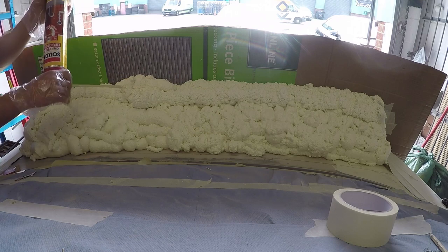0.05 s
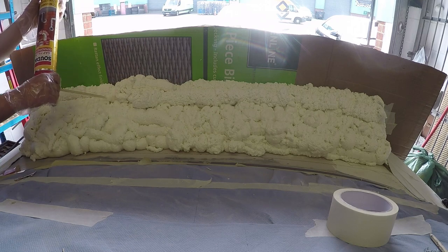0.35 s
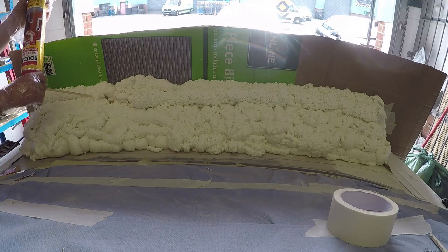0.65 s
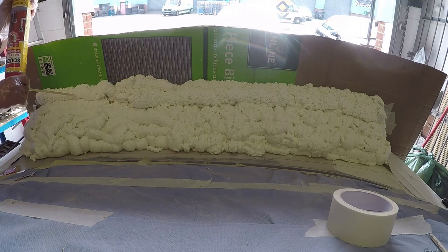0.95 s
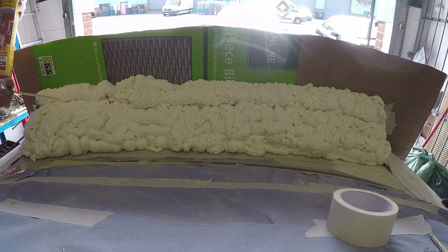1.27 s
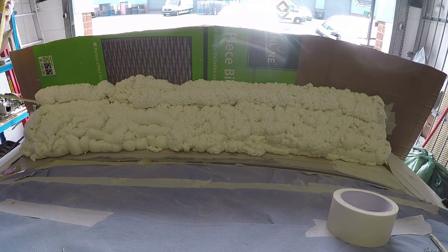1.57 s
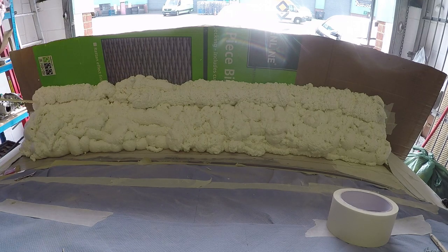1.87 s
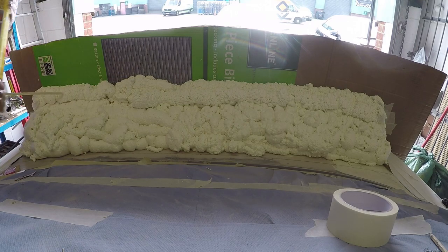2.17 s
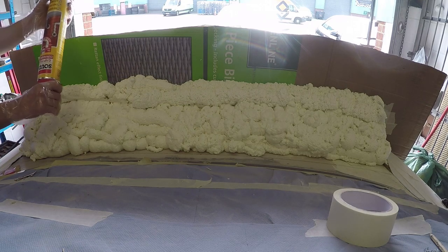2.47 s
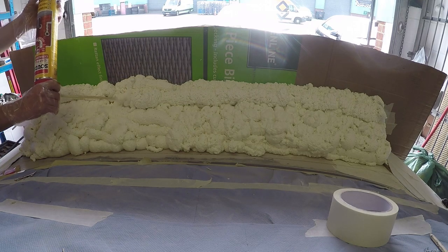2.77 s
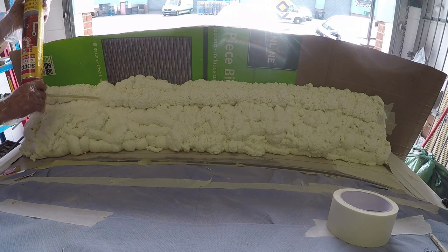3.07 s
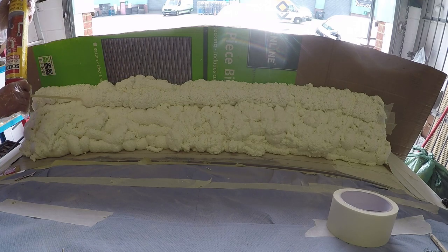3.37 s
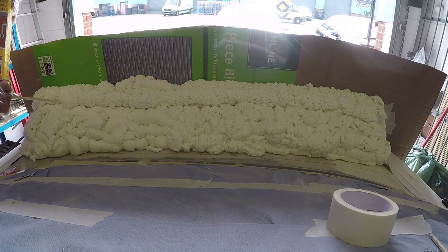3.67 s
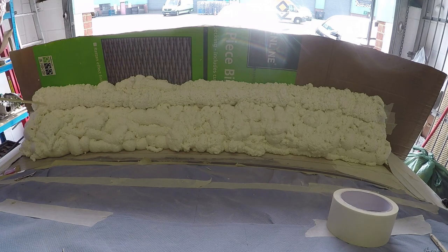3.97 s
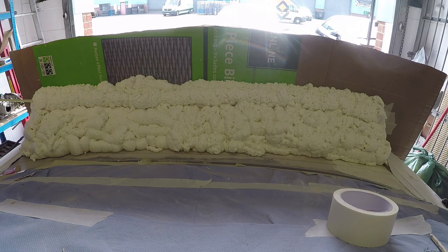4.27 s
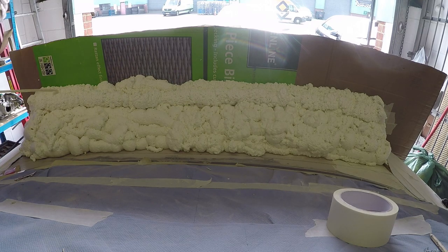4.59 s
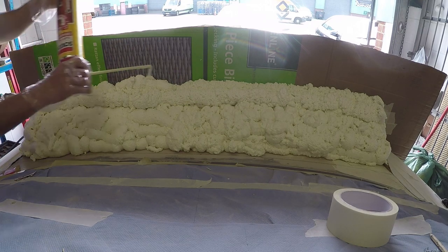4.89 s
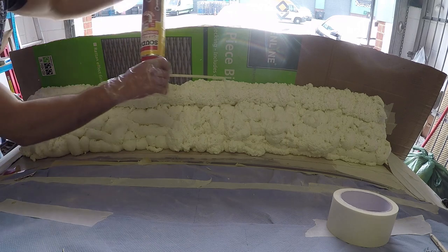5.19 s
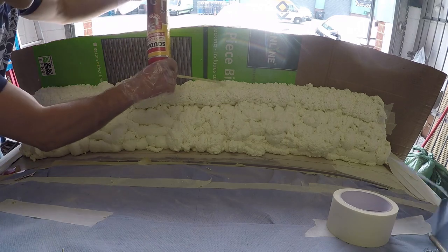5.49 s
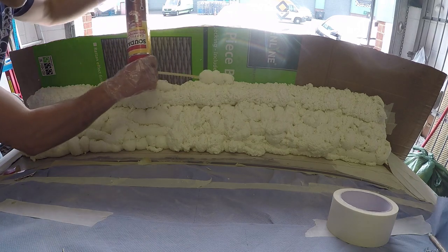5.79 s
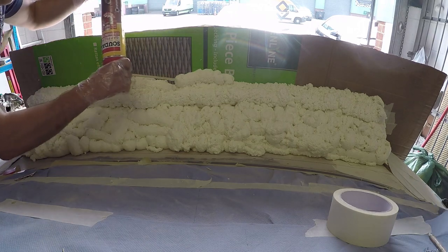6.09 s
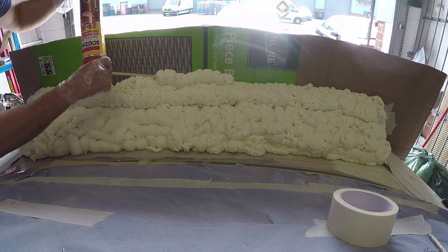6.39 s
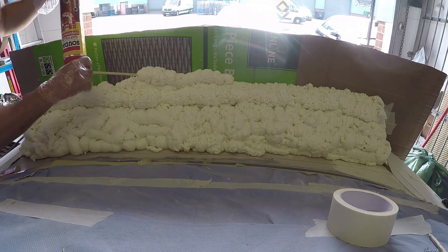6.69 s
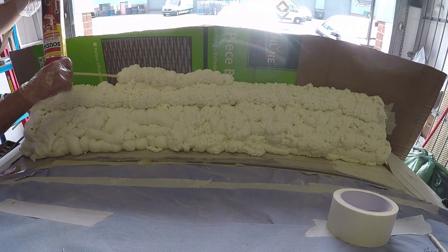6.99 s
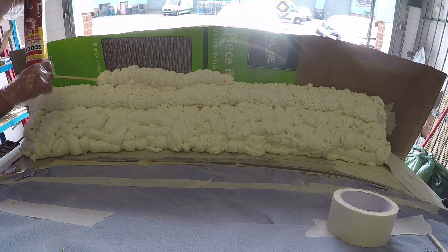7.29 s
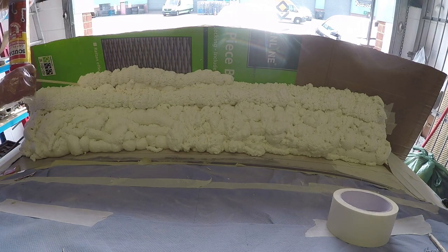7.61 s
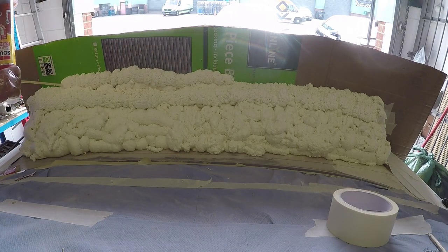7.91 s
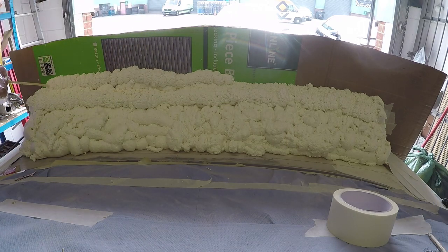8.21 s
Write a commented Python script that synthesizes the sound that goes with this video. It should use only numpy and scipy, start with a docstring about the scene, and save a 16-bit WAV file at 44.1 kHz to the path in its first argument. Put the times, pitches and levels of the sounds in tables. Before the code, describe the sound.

Foam spits and crackles from a spray can in three hissing bursts, the last one longest, over a faint low workshop rumble.

```python
"""Expanding foam in a workshop

A can of foam is sprayed through a straw in three long bursts. Each time the valve opens, gas hisses
first; then the foam spits and sputters as countless bubbles burst, coloured by the resonances of
hollows in the foam bead. In the pauses the reverberation dies away over a low rumble and faint ticks."""
import sys
import numpy as np
from scipy import signal
from scipy.fft import rfft, irfft
from scipy.io import wavfile
from scipy.ndimage import uniform_filter1d

SR = 44100
rng = np.random.default_rng(int(sys.argv[2]) if len(sys.argv) > 2 else 0)


def pcm_store(signal):
    """Save signal as 16-bit PCM."""
    levels = np.round(np.clip(np.atleast_2d(signal), -1, 1) * 32767)
    wavfile.write(sys.argv[1], SR, levels.astype(np.int16).T)


N = 363825
TIME = np.arange(N) / SR
FRAME, HOP = 512, 128
HZ = np.fft.rfftfreq(FRAME, 1 / SR)[:, None]
CLOSE_S = 0.087  # time the valve takes to shut

# Squeezes of the trigger. Each row: arrival of the foam, lead of the gas and duration of the foam in
# seconds, first crack in dB, nominal pressure sag in dB per second, valve opening time in seconds,
# and relative levels of gurgle, coarse bubbles and fine bubbles in dB.
SQUEEZES = [(0.364, 0.085, 1.44, 6, 2.5, 0.005, -32.5, -32.5, -20.5),
            (2.676, 0.14, 1.55, 15.5, 1.5, 0.039, -33.5, -32, -22),
            (5.563, 0.13, 2.68, 13.5, 0.47, 0.075, -31.5, -31, -25)]
# Spectra of the coarse and the fine bubbles. Each row: frequency in Hz, relative level in dB.
COARSE_SPECTRUM = [(600, -23.5), (1050, -8), (1300, -3), (2200, -2.5), (2700, -6), (4500, -33)]
FINE_SPECTRUM = [(1400, -25), (2200, -7), (2800, -3), (3500, -1.5), (4500, -4), (5500, -10), (6700, -15),
                 (8200, -25), (12000, -49.5)]


def amp(db):
    """Amplitude grows tenfold for every 20 dB."""
    return 10 ** (np.asarray(db) / 20)


def unit(x):
    """Normalisation to an rms of 1."""
    return x / np.sqrt(np.mean(x ** 2) + 1e-20)


def at_frequency(points, hz):
    """Linear interpolation on a logarithmic frequency axis."""
    frequencies, values = np.transpose(points)
    return np.interp(np.log(hz + 1), np.log(frequencies + 1), values)


def bell(x, centre, width):
    """A Gaussian of height 1 with the given full width at half height."""
    return np.exp(-np.log(2) * (2 * (x - centre) / width) ** 2)


def coloured_noise(spectrum):
    """Spectral weighting turns white noise into coloured noise of rms 1."""
    gain = amp(at_frequency(spectrum, np.fft.rfftfreq(N, 1 / SR)))
    return unit(irfft(rfft(rng.standard_normal(N)) * gain, N))


def wander(rate_hz):
    """Low-passed noise of rms 1 fluctuates at up to about the given rate."""
    lowpass = bell(np.fft.rfftfreq(N, 1 / SR), 0, 2 * rate_hz)
    return unit(irfft(rfft(rng.standard_normal(N)) * lowpass, N))


def patches(shape, across_hz, lasting_s):
    """Smoothing correlates a random field of rms 1 over frequency and time."""
    field = rng.standard_normal(shape)
    for axis, span in enumerate([across_hz * FRAME / SR, lasting_s * SR / HOP]):
        lowpass = np.expand_dims(bell(np.fft.rfftfreq(shape[axis]), 0, 1 / span), 1 - axis)
        field = irfft(rfft(field, axis=axis) * lowpass, shape[axis], axis=axis)
    return unit(field)


def earlier_burst(db, pause_s):
    """Reverberation outlasts its source: froth in the second before the scene excites the room."""
    froth = unit(coloured_noise(FINE_SPECTRUM) + 0.64 * coloured_noise(COARSE_SPECTRUM))
    return (amp(db) * froth * (TIME < 1 - pause_s))[:SR]


def reverberation(source, gap_s):
    """Dense reflections form a diffuse field that decays exponentially, each band at its own rate."""
    # Decay of the workshop. Each row: frequency in Hz, time to fall by 60 dB in seconds.
    decay_times = [(200, 1.2), (530, 0.32), (1400, 1.01), (3300, 1.03), (6000, 0.7), (10000, 0.61),
                   (15000, .35)]
    # Strength of the diffuse field. Each row: frequency in Hz, relative level in dB.
    strengths = [(200, -4.5), (650, -3), (1400, -3.5), (3300, -9), (6000, -8.5), (14000, -9.5)]
    _, t, noise = signal.stft(rng.standard_normal(SR * 2), SR, nperseg=FRAME)
    decay = amp(-60 * t / at_frequency(decay_times, HZ)) * (t >= gap_s)
    decay /= np.sqrt(np.mean(decay ** 2, axis=1, keepdims=True) * SR * 2)
    tail = signal.istft(noise * decay * amp(at_frequency(strengths, HZ)), SR, nperseg=FRAME)[1]
    return signal.fftconvolve(source, tail)


def background(rumble_db, hum_hz, hum_db):
    """Broadband rumble lies under a machine hum, randomly modulated in frequency and amplitude."""
    # Ambient noise of the workshop. Each row: frequency in Hz, relative level in dB.
    rumble_spectrum = [(20, -12), (33, -7), (55, -11), (90, -17), (170, -21), (300, -30), (750, -33.5),
                       (1200, -34.5), (3000, -40), (7000, -50), (15000, -58.5)]
    pitch_hz = hum_hz + 1.11 * wander(rate_hz=5.2)
    hum = np.sqrt(2) * np.sin(2 * np.pi * np.cumsum(pitch_hz) / SR)
    rumble = amp(rumble_db) * coloured_noise(rumble_spectrum)
    return rumble + amp(hum_db + 3.9 * wander(rate_hz=6.5)) * hum


def flow(held_db, leak_db, fill_db_per_s, gush_db, slump_db, sag_share, shut_db):
    """Amplitude follows the flow, which leaks, gushes, slumps, sags with the pressure and is shut off."""
    fade_in_s, fade_in_db = 0.073, -9.5  # a faint hiss fades in just before each burst
    arrive_s, settle_s = 0.018, 0.09  # the foam bursts out and its gush settles
    slump_after_s, slump_s = 0.17, 0.17  # the pressure in the straw is spent
    gain = np.zeros(N)
    for (arrival, leak_s, lasts_s, _, sag_db_per_s, opening_s, *_), db in zip(SQUEEZES, held_db):
        wait, age = np.maximum(arrival - TIME, 0), np.maximum(TIME - arrival, 0)
        onset = np.interp(leak_s - wait, [-fade_in_s, 0, opening_s], [0, amp(fade_in_db), 1])
        filling = leak_db - fill_db_per_s * wait
        gush = gush_db * np.exp(-age / settle_s)
        slump = slump_db * bell(age, slump_after_s, slump_s)
        foaming = gush + slump - sag_share * sag_db_per_s * age
        arrived = np.minimum(age / arrive_s, 1)
        shut = np.clip((age - lasts_s) / CLOSE_S, 0, 1)
        level_db = db + (1 - arrived) * filling + arrived * foaming + shut_db * shut
        gain += onset * (shut < 1) * amp(level_db)
    return uniform_filter1d(gain, size=150)


def envelopes():
    """One flow drives gurgle, coarse bubbles, fine bubbles and gas, each with its own envelope."""
    # Gas hiss, one curve a burst. Each point: time in seconds, relative level in dB.
    hiss_curves = [
        [(0.425, -43.5), (0.455, -57.5), (0.837, -41), (1.349, -49), (1.469, -55.5), (1.657, -46.5),
         (1.81, -55)],
        [(2.78, -45.5), (4.006, -44), (4.3, -45)],
        [(5.68, -43), (5.78, -52.5), (6.14, -44.5), (7.62, -46), (7.69, -52), (8.2, -51.5)],
    ]
    # Stretches of coarser foam. Each row: middle and length in seconds, lifts of the gurgle and of
    # the coarse bubbles in dB.
    coarse_runs = [(0.574, 0.17, 3.5, 4), (1.71, 0.21, -2.5, 4), (6.36, 0.54, -0.5, 4.5),
                   (8.2, 0.37, 1.5, 4)]
    *_, gurgle_db, coarse_db, fine_db = np.transpose(SQUEEZES)
    gas_db = [np.interp(TIME, *np.transpose(curve)) for curve in hiss_curves]
    wetter = sum(db * bell(TIME, s, length) for s, length, db, _ in coarse_runs)
    coarser = sum(db * bell(TIME, s, length) for s, length, _, db in coarse_runs)
    gurgle = flow(gurgle_db, leak_db=1, fill_db_per_s=142,
                  gush_db=-3.5, slump_db=-4, sag_share=0.95, shut_db=0.5)
    coarse = flow(coarse_db, leak_db=-3, fill_db_per_s=129,
                  gush_db=13.5, slump_db=1, sag_share=1.14, shut_db=4)
    fine = flow(fine_db, leak_db=-20, fill_db_per_s=75,
                gush_db=1, slump_db=-3.5, sag_share=1.06, shut_db=-11)
    gas = flow(gas_db, leak_db=0.5, fill_db_per_s=61.5,
               gush_db=4, slump_db=1.7, sag_share=0, shut_db=-10.5)
    return gurgle * amp(wetter), coarse * amp(coarser), fine, gas


def bubbles(per_s, spread_db, rush):
    """Bursting bubbles make shot noise: independent random clicks, here in a smooth rush of gas."""
    sizes = amp(spread_db * np.minimum(rng.standard_normal(N), 2)) * rng.choice([-1, 1], N)
    clicks = sizes * (rng.random(N) < per_s / SR)
    return unit(unit(clicks) + rush * rng.standard_normal(N))


def bead_resonances(t):
    """Cavities in the foam resonate and shift as it grows: a lift in dB by frequency and frame."""
    # The cavity dug by the jet. Each row: time in seconds, resonance in Hz, lift in dB, width in Hz.
    jet_cavity = [(.45, 3240, 0, 500), (.65, 3320, 5.5, 500), (.95, 3400, 8, 380), (1.35, 3600, 5.5, 400),
                  (1.6, 3400, 1.5, 400), (2.75, 3100, 7.5, 450), (2.9, 3480, 2.5, 1000),
                  (3.33, 4050, 4.5, 800), (3.58, 3850, 2.5, 600), (3.7, 3560, 7.5, 400),
                  (4.12, 3520, 8, 380), (4.33, 3170, 2, 500), (5.7, 3060, 2, 400), (8.2, 2920, 4.5, 350)]
    # Hollows around the straw tip, one list a burst. Each row: centre and width in Hz, lift in dB.
    tip_hollows = [
        [(636, 170, 3.5), (1370, 200, 4), (2200, 270, 1.5), (2800, 260, 5.5), (3980, 300, 0), (4530, 580, 0.5),
         (6160, 1100, -5)],
        [(873, 136, -10), (1125, 270, 4), (1720, 480, 1.5), (4440, 500, -1.5), (5300, 420, 2), (6800, 750, 0)],
        [(314, 67, -1), (680, 500, 6.5), (1270, 420, -2), (2180, 200, 2.5), (3430, 210, -0.5), (3930, 490, 3.5),
         (5160, 500, -4.5), (6300, 910, 1.5)],
    ]
    # Gas pockets that ring as they blow open or muffle as they fill. Each row: middle and length in
    # seconds, centre and width in Hz, lift in dB, glide in Hz per second.
    gas_pockets = [ (0.402, 0.045, 2430, 706, 8, 0), (0.737, 0.11, 5500, 800, 11, -2000),
                   (0.86, 0.17, 4650, 580, 12, -900), (1.55, 0.26, 4500, 805, 5, 0),
                   (1.717, 0.2, 2900, 700, -4, 0), (2.694, 0.026, 4750, 750, 17, 0),
                   (3.558, 0.084, 6430, 1200, 8, 0), (3.87, 0.34, 4050, 450, -7, 0),
                   (3.93, 0.15, 2900, 360, 13.5, 2800), (4.1, 0.17, 4900, 1100, 9, -1500),
                   (5.585, 0.024, 3350, 600, 17.5, -4), (5.587, 0.043, 5760, 2400, 14, -2),
                   (6.894, 0.4, 6300, 1600, 7, 0), (8.1, 0.94, 6700, 1200, -3, 0),
                   (8.15, 0.5, 355, 300, -4.5, 0), ]
    times, *columns = np.transpose(jet_cavity)
    cavity_hz, cavity_db, cavity_width = (np.interp(t, times, column) for column in columns)
    lift = cavity_db * bell(HZ, cavity_hz, cavity_width)
    for (arrival, leak_s, lasts_s, *_), hollows in zip(SQUEEZES, tip_hollows):
        spraying = (t >= arrival - leak_s) & (t <= arrival + lasts_s + CLOSE_S)
        lift += sum(db * bell(HZ, hz, width) for hz, width, db in hollows) * spraying
    for s, length, hz, width, db, glide in gas_pockets:
        lift += db * bell(HZ, hz + glide * (t - s), width) * bell(t, s, length)
    swelling = 1.28 * patches(lift.shape, across_hz=170, lasting_s=0.12)  # the bead grows slowly
    frothing = 2.03 * patches(lift.shape, across_hz=600, lasting_s=0.025)  # its skin opens and closes
    return lift + swelling + frothing


def resonate(drive, spectrum, lift):
    """A time-varying filter redistributes the power of a white source without changing its total."""
    frames = signal.stft(drive, nperseg=FRAME, noverlap=FRAME - HOP)[2]
    gain = amp(at_frequency(spectrum, HZ) + lift[:, :frames.shape[1]])
    gain /= np.sqrt(np.mean(gain ** 2, axis=0))
    return signal.istft(frames * gain, nperseg=FRAME, noverlap=FRAME - HOP)[1][:N]


def cracks(rise_s, decay_s):
    """Releasing the pressure stored in the straw makes a transient: a brief lift in dB."""
    return sum(db * np.interp(TIME - arrival, [0, rise_s, rise_s + decay_s], [0, 1, 0])
               for arrival, _, _, db, *_ in SQUEEZES)


def spray(lift):
    """Plugs of foam leaving the straw modulate the amplitude of bubble and gas noise into a sputter."""
    # Spectra of the gurgle and the escaping gas. Each row: frequency in Hz, relative level in dB.
    gurgle_spectrum = [(50, -46), (120, -37), (200, -2.5), (350, -0.5), (680, 2), (1000, 2.5), (1400, -11),
                       (2500, -43)]
    gas_spectrum = [(2000, -29), (3100, -0.5), (4500, 1), (8000, -7), (10000, -6.5), (13000, -8),
                    (15500, -15.5)]
    plugs, surges = wander(rate_hz=140), 0.65 * wander(rate_hz=7)
    crack = cracks(rise_s=0.011, decay_s=0.036)
    gurgle_drive = bubbles(per_s=2500, spread_db=4, rush=1.54)
    coarse_drive = bubbles(per_s=4000, spread_db=2, rush=0.93) * amp(0.35 * plugs)
    fine_drive = bubbles(per_s=7500, spread_db=3.5, rush=1) * amp(1.1 * plugs)
    gas_drive = bubbles(per_s=8300, spread_db=0, rush=2.6) * amp(1.6 * plugs)
    gurgle = resonate(gurgle_drive, gurgle_spectrum, lift) * amp(-1.5 + surges)
    coarse = resonate(coarse_drive, COARSE_SPECTRUM, lift) * amp(-2 + surges)
    fine = resonate(fine_drive, FINE_SPECTRUM, lift) * amp(-1.33 + surges + 0.36 * crack)
    gas = resonate(gas_drive, gas_spectrum, lift) * amp(5.5 + surges + crack)
    sputter = sum(part * gain for part, gain in zip([gurgle, coarse, fine, gas], envelopes()))
    return sputter + spits(lift, plugs, hole_db=8, hole_width_hz=1460)


def spits(lift, plugs, hole_db, hole_width_hz):
    """A slug of gas escaping between plugs of foam excites the resonance of the hole it blows."""
    # Slugs of gas. Each row: middle and length in seconds, level in dB, resonance of the hole in Hz.
    slugs = [(1.49, 0.037, -28, 4200), (1.54, 0.04, -25, 4500), (1.657, 0.023, -21.5, 4170),
             (2.745, 0.077, -23.5, 3100), (2.808, 0.028, -20.5, 3300), (3.018, .034, -31, 3480),
             (3.548, 0.035, -29, 3900), (3.688, 0.046, -22, 3600), (4.306, 0.074, -23, 3100),
             (5.635, 0.025, -21, 2200), (5.744, 0.073, -20.5, 2400), (5.863, 0.025, -23, 3650),
             (6.036, 0.03, -22, 2670), (6.241, 0.04, -21, 3330), (6.373, 0.03, -20, 2770),
             (6.597, 0.085, -23.5, 3200), (6.741, 0.047, -20.5, 2770), (6.877, 0.097, -24, 2930),
             (7.017, 0.038, -21.5, 2870), (7.118, 0.035, -21.5, 3630), (7.178, 0.038, -21, 3620),
             (7.243, 0.024, -20.5, 3550), (7.316, 0.044, -22, 3540), (7.56, 0.078, -25, 3100),
             (7.7, 0.056, -24.5, 3430), (7.794, .035, -25, 3850), (7.957, 0.076, -26.5, 2580)]
    # Spectrum of a spit. Each row: frequency in Hz, relative level in dB.
    spit_spectrum = [(1000, -26), (1700, -3.5), (3000, -2), (4300, -1.5), (5100, -9.5), (8000, -34)]
    middles, _, _, hole_hz = np.transpose(slugs)
    frame_times = np.arange(lift.shape[1]) * HOP / SR
    nearest = abs(frame_times - middles[:, None]).argmin(axis=0)
    hole = hole_db * bell(HZ, hole_hz[nearest], hole_width_hz)
    envelope = sum(amp(db) * bell(TIME, s, length) for s, length, db, _ in slugs)
    drive = bubbles(per_s=9800, spread_db=1, rush=0.88) * amp(0.8 * plugs)
    return resonate(drive, spit_spectrum, lift + hole) * envelope


def ticks(decay_s, width_hz):
    """The straw and the settling foam snap: heavily damped transients with broad spectra."""
    # Tiny snaps. Each row: start in seconds, peak level in dB, centre frequency in Hz.
    snaps = [(2.253, -56, 7500), (4.952, -59, 7000), (5.066, -59, 12500), (5.099, -54, 8000)]
    out, t = np.zeros(N), np.arange(1024) / SR
    for s, db, hz in snaps:
        band = bell(np.fft.rfftfreq(len(t), 1 / SR), hz, width_hz)
        snap = irfft(rfft(rng.standard_normal(len(t))) * band) * np.exp(-t / decay_s)
        out[round(s * SR):][:len(t)] += amp(db) * snap / abs(snap).max()
    return out


def scene():
    """Direct sound, reverberant field and background add by superposition."""
    colour = bead_resonances(np.arange(N // HOP + 3) * HOP / SR)
    direct = spray(colour) + ticks(decay_s=0.002, width_hz=4500)
    all_round = spray(0.24 * colour)  # averaged over all directions, the bead's colour is much weaker
    room_drive = np.concatenate([earlier_burst(db=-28.5, pause_s=0.21), all_round])
    room = reverberation(room_drive, gap_s=0.006)[SR:][:N]
    return (direct + room + background(rumble_db=-53, hum_hz=56.4, hum_db=-60.5))[None]


def record(dry):
    """A linear-phase low-pass filter limits the bandwidth."""
    edge_hz = 15400
    lowpass = signal.firwin(511, edge_hz, window=("kaiser", 9), fs=SR)
    return signal.oaconvolve(dry, lowpass[None], "same")


dry = scene()
out = record(dry)
pcm_store(out)
```